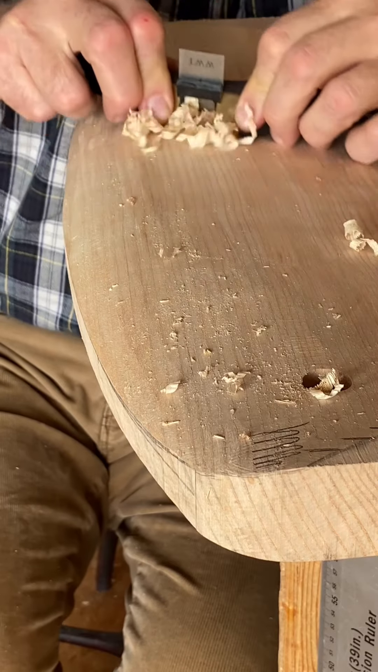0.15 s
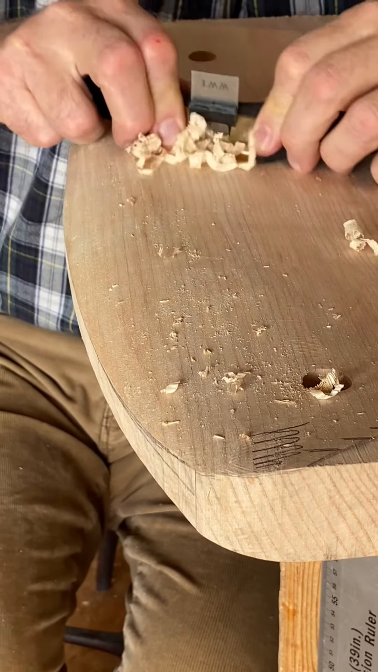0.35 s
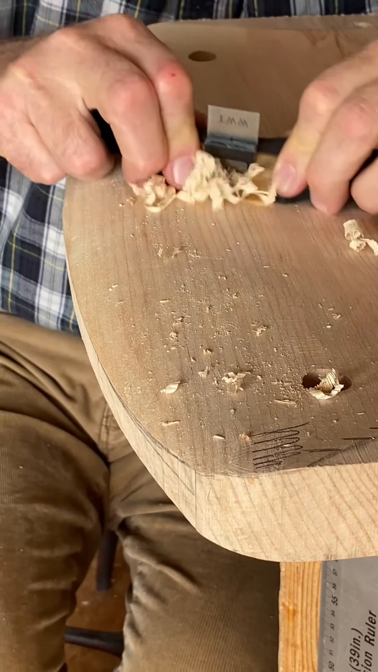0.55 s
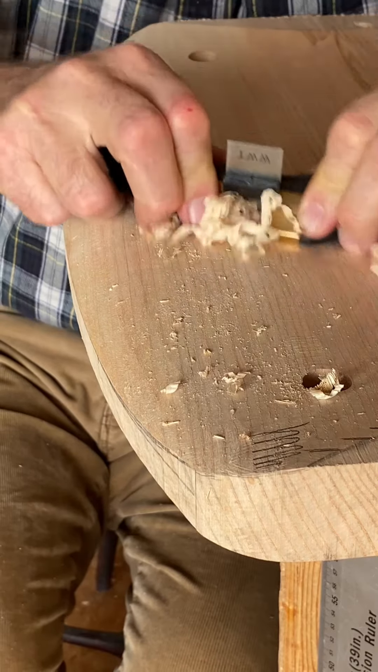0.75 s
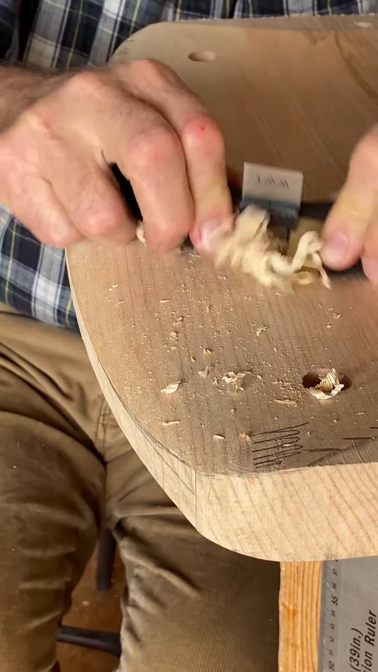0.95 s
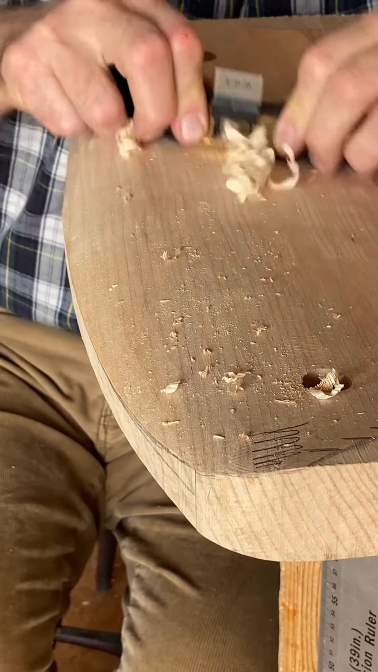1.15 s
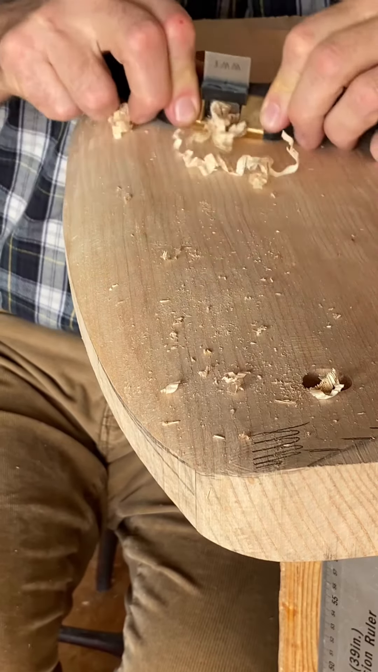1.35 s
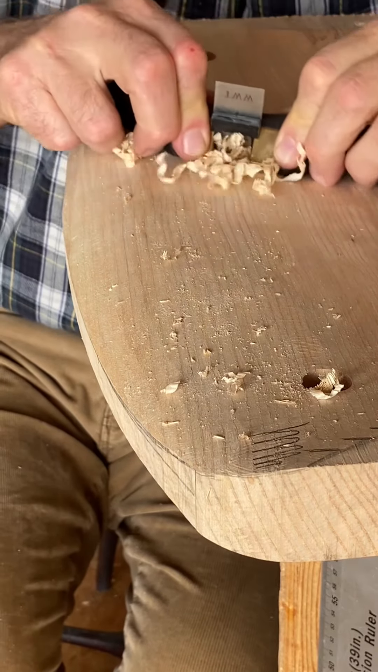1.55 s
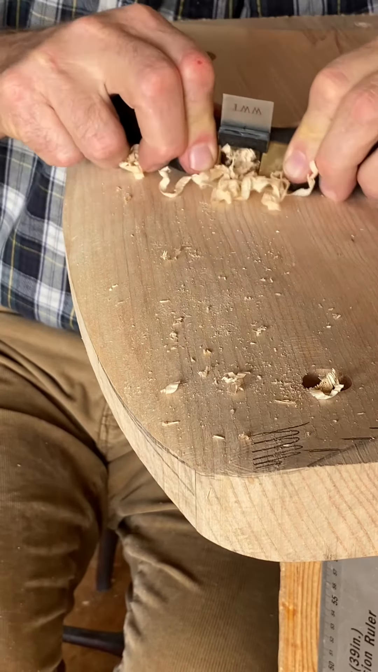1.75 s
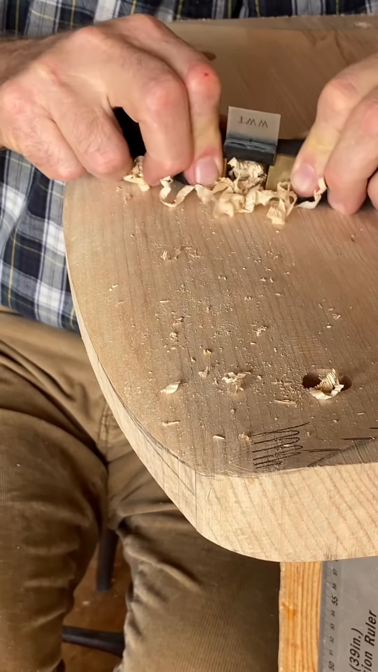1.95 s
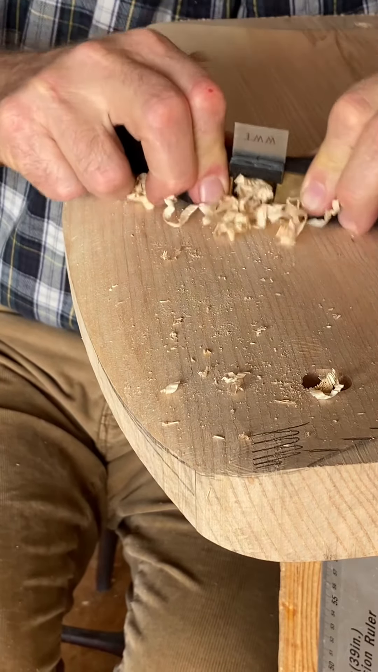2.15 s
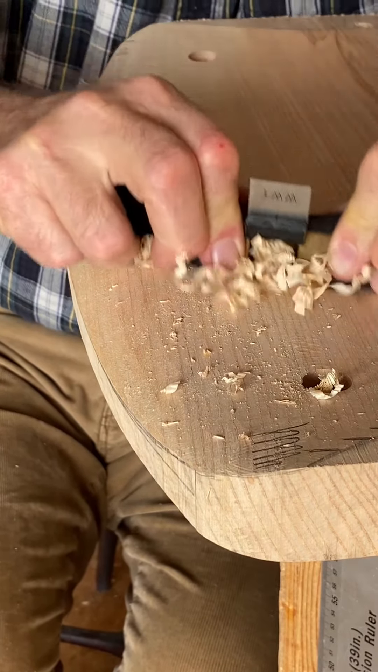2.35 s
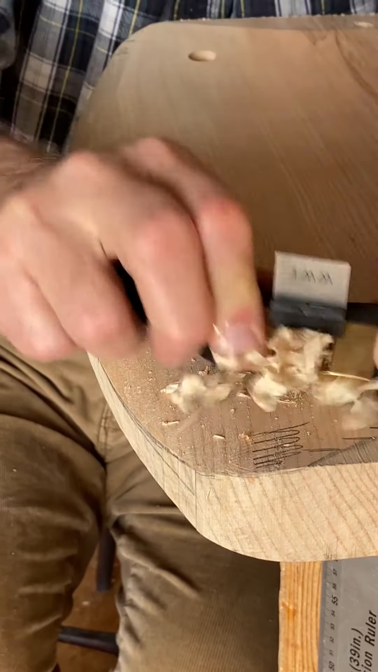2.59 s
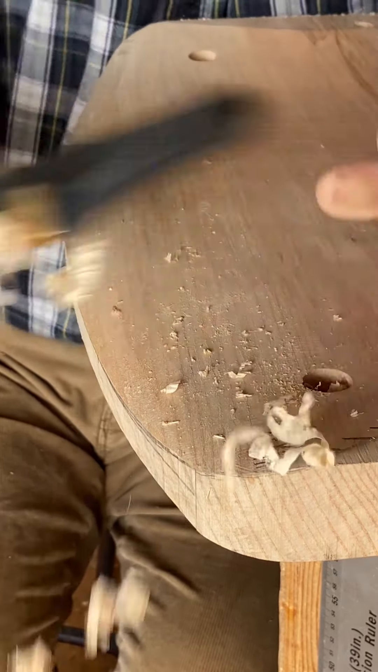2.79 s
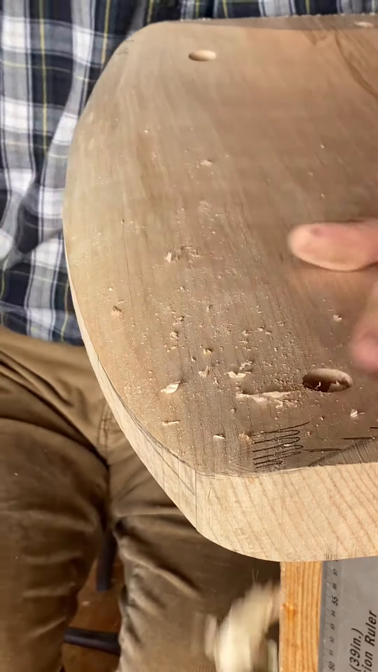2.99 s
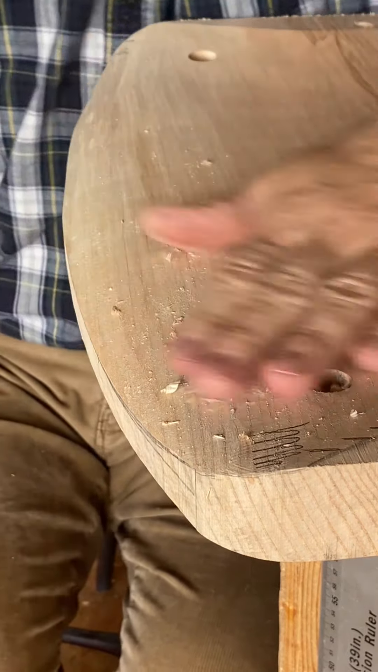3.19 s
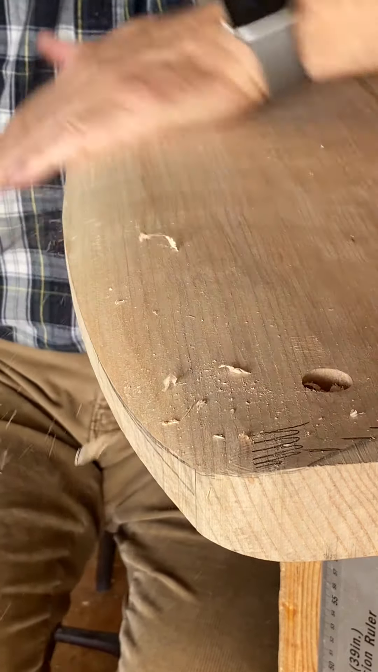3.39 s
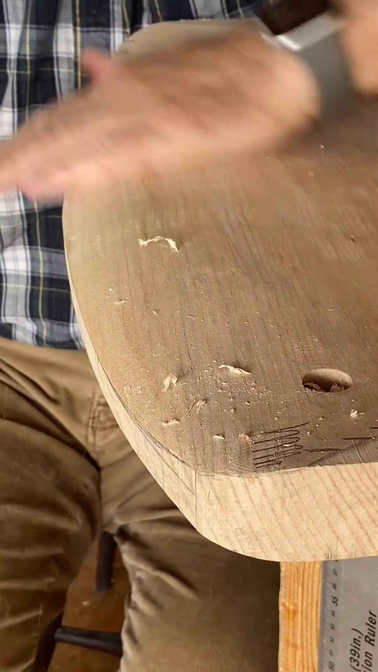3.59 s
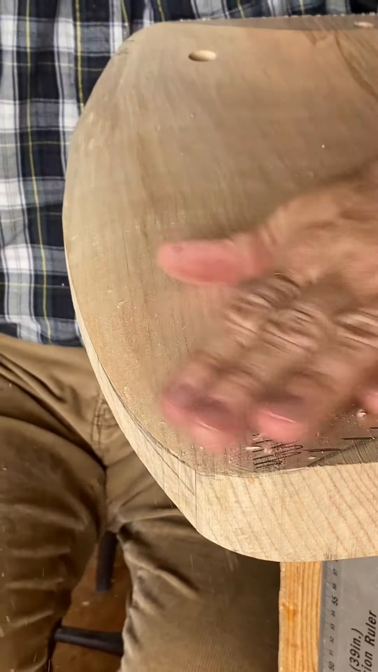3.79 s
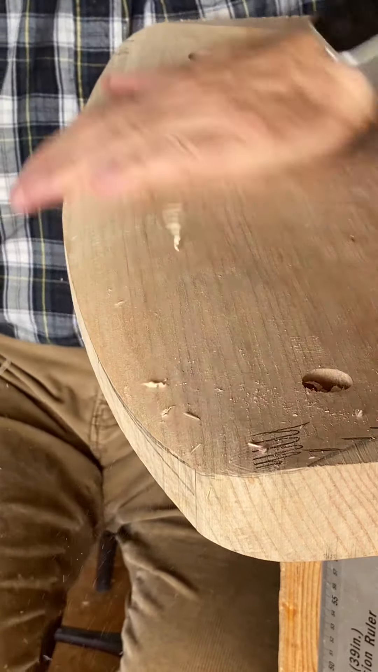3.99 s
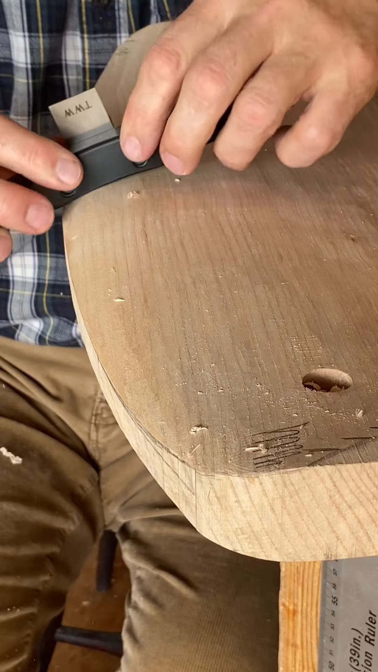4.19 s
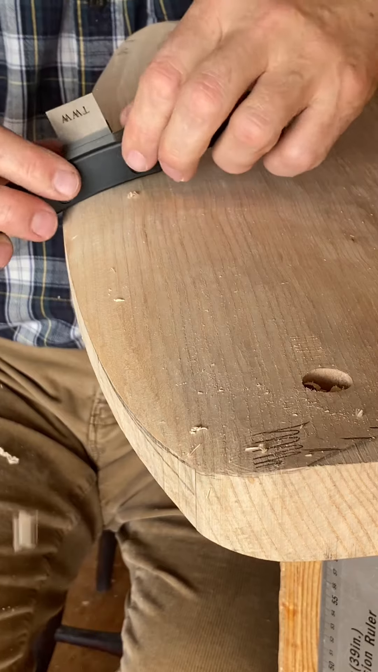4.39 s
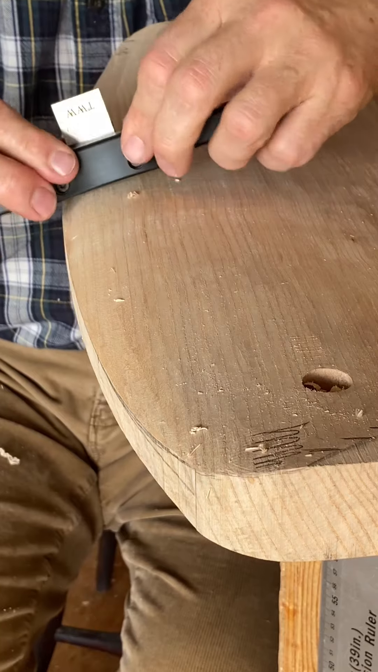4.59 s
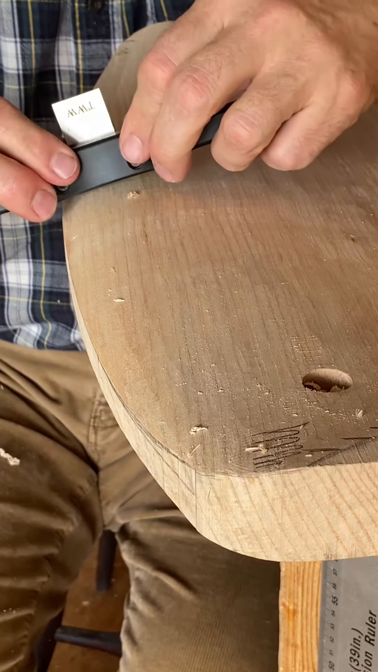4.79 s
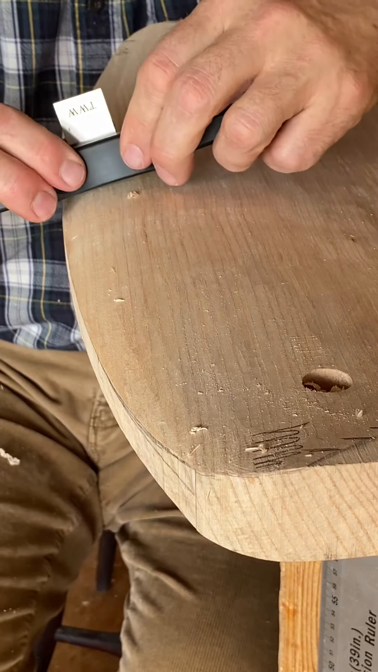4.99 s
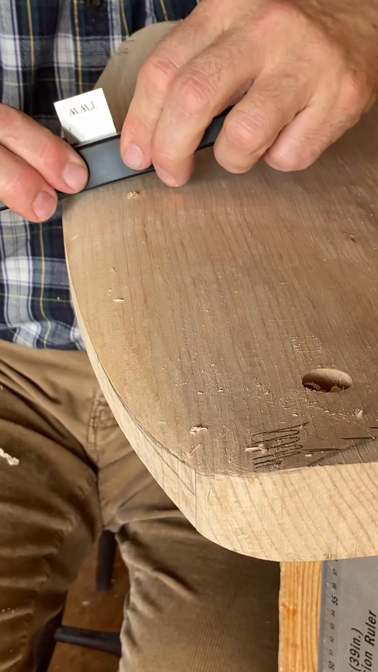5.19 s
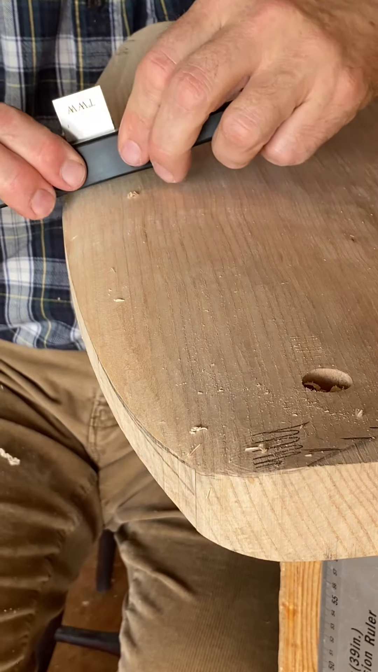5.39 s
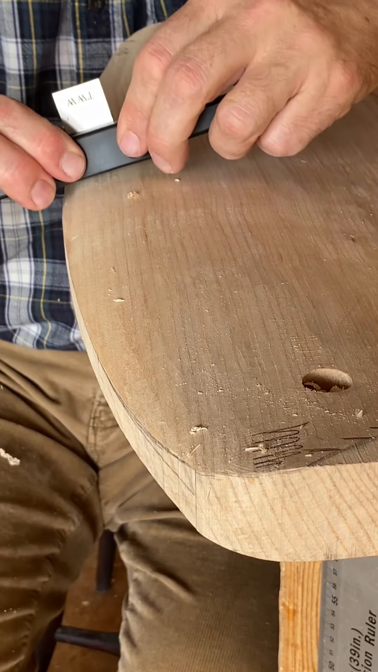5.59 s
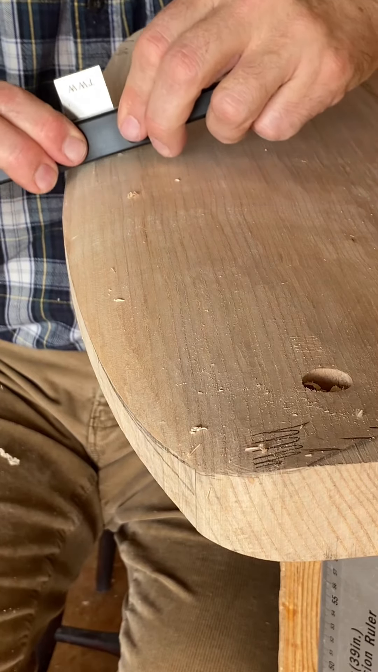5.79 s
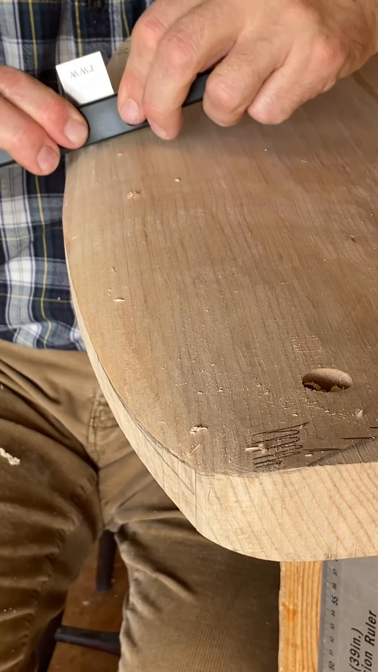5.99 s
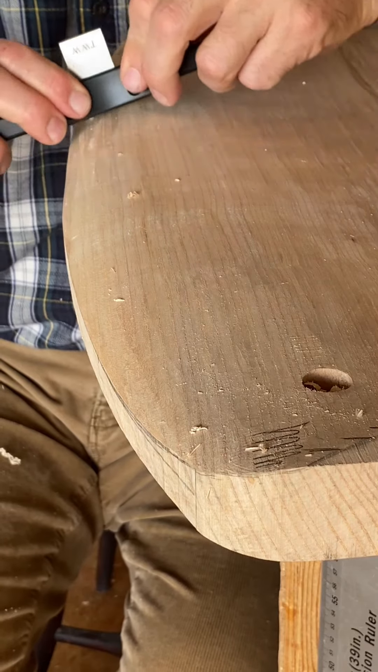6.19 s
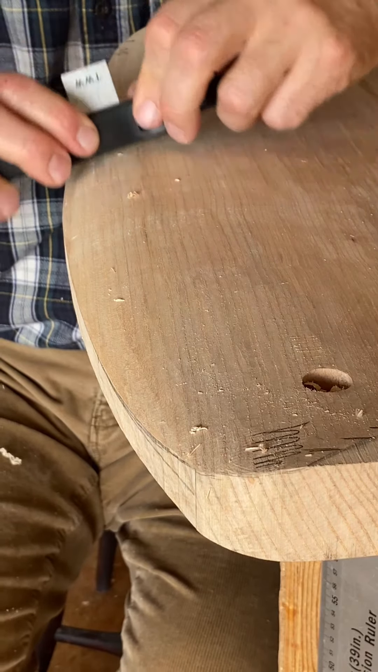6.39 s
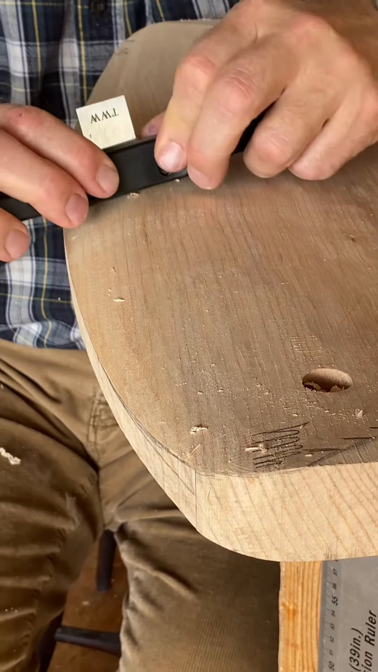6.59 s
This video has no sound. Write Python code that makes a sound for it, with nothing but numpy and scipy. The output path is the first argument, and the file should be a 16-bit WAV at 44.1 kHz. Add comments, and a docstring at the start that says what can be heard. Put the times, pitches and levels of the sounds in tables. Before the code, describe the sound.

A hand scraper rasps across a resonant wooden board, hand sweeps hiss over it, near silence follows, then duller creaking strokes work along the edge.

```python
"""Hand scraper on a hardwood board

A blade is pushed over the face of a seat board, a palm sweeps it, then the blade works along the rim. Random
slips drive board and springy blade resonances; filtered grains make edge rasp and fibre hiss. Sawtooth runs
judder and groan; blows and cracks ring in a short workshop reverb, while rustles and a low rumble join dry. Two
microphone ports hear it with phase lag, partial coherence and a level balance per frequency."""
import sys
import numpy as np
from scipy import signal
from scipy.fft import rfft, irfft, next_fast_len
from scipy.io import wavfile

SR = 44100
rng = np.random.default_rng(int(sys.argv[2]) if len(sys.argv) > 2 else 0)


def generate_wav(signal):
    """Clip the signal to [-1, 1] and save it as 16-bit WAV at the path in sys.argv[1]."""
    frames = np.transpose(np.atleast_2d(signal))
    scaled = np.clip(frames, -1, 1) * 32767
    pcm = np.round(scaled).astype(np.int16)
    wavfile.write(sys.argv[1], SR, pcm)


N = 293265
TAPS = 16384  # length of the impulse responses, samples
TIME = np.arange(N) / SR
TAP_TIME = np.arange(TAPS) / SR
BINS = np.fft.rfftfreq(TAPS, 1 / SR)
SWEEPING_STOPS_S = 4.02  # the sweeping sound breaks off abruptly here; earlier blows excite the face, later ones the rim
STROKE_ARCH, SWEEP_ARCH = 1.72, 2  # a higher power gives a flatter top to the arch of hand speed

# fizz of dust and dry curls, relative spectrum: f/Hz, level/dB
DUST_COLOUR = [(6000, -30.5), (10000, -1), (12000, 0), (14300, 1.5), (15600, 0)]


def amp(db):
    """Decibels to gain."""
    return 10 ** (np.asarray(db) / 20)


def unit(x):
    """Scales to rms 1."""
    return x / np.sqrt(np.mean(x ** 2) + 1e-20)


def read(table, hz=BINS, axis=1):
    """One column of a table, interpolated along log frequency."""
    table = np.array(table, float)
    return np.interp(np.log(hz + 1), np.log(table[:, 0] + 1), table[:, axis])


def add(mix, s, peak_db, sound):
    """Mixes a sound in at time s, scaled to the given peak."""
    sound = amp(peak_db) * sound / abs(sound).max()
    part = mix[round(s * SR):][:len(sound)]
    part += sound[:len(part)]


def response(gain, band):
    """Minimum-phase impulse response of a gain curve; white noise of rms 1 leaves rms 1 in the band."""
    in_band = (BINS > band[0]) * (BINS < band[1])
    gain = gain / np.sqrt(np.mean(gain ** 2 * in_band))
    cepstrum = irfft(np.log(np.maximum(gain, 1e-5)))
    # fold the cepstrum to make it causal
    cepstrum[1:TAPS // 2] *= 2
    cepstrum[TAPS // 2 + 1:] = 0
    return irfft(np.exp(rfft(cepstrum)))


def ring(x, impulse):
    """Plays x through an impulse response."""
    return signal.oaconvolve(x, impulse)[:len(x)]


def coloured(x, colour, band):
    """Filters x by a table of f/Hz, level/dB, normalised in the band."""
    return ring(x, response(amp(read(colour)), band))


def lowpass(x, hz):
    """Second-order low-pass."""
    return signal.sosfilt(signal.butter(2, min(hz, SR / 2 - 1), fs=SR, output="sos"), x)


def wander(hz):
    """Slow random drift of rms 1, low-passed at the given rate."""
    return unit(lowpass(rng.standard_normal(N), hz))


def grains(per_s, spread_db):
    """Clicks of random sign at random moments, most small and a few large, rms 1."""
    size = amp(spread_db * np.minimum(rng.exponential(1, N), 4))
    sign = rng.choice([-1, 1], N)
    return unit(size * sign * (rng.random(N) < per_s / SR))


def sawtooth(turns, harmonics):
    """Sawtooth with a limited number of harmonics, from its phase in turns."""
    return sum(np.sin(2 * np.pi * k * turns) / k for k in range(1, harmonics + 1))


def resonate(x, hz, width_hz):
    """A resonance of gain 1 that follows the curve hz."""
    turn = np.exp(2j * np.pi * np.cumsum(hz) / SR)
    r = np.exp(-np.pi * width_hz / SR)
    # shift the resonance to 0 Hz, smooth, shift back
    smooth = signal.lfilter([1 - r], [1, -r], x / turn + 1e-18)
    return 2 * (turn * smooth).real


def swell(moves, axis, dip_db, arch):
    """Gain from a dB column: tops at start + rise, dip_db lower at the ends; overlaps add in power."""
    power = np.zeros(N)
    for move in moves:
        start, rise, fall = move[:3]
        from_top = TIME - start - rise
        slowness = np.maximum(-from_top / rise, from_top / fall)
        near = slowness < 3  # the tails run on past the ends
        power[near] += amp(move[axis] - dip_db * slowness[near] ** arch) ** 2
    return np.sqrt(power)


def scrape(face, rim):
    """The blade sticks and slips at random, digging in and letting go over the grain."""
    # pushes over the face, relative levels: start t/s, speeding up t/s, slowing down t/s,
    # cutting force/dB, slow flexing/dB, edge rasp/dB, fibre hiss/dB, held blade resonance f/Hz
    face_strokes = [(0.0, 0.074, 0.21, -35.5, -43.5, -46.5, -57.5, 528),
                    (0.19, .19, 0.22, -35.5, -45.5, -46.5, -56.5, 486.6),
                    (0.5, 0.2, 0.13, -33, -42, -38.5, -50, 447),
                    (0.872, 0.026, 0.21, -36, -56, -42, -59.5, 534),
                    (0.93, 0.068, 0.19, -30.5, -48, -42, -57.5, 545),
                    (1.23, 0.088, 0.24, -35, -45.5, -47, -55.5, 505),
                    (1.56, 0.14, 0.12, -38.5, -48.5, -52, -60, 440),
                    (1.78, 0.088, 0.13, -43.5, -45, -57.5, -68, 440),
                    (1.97, 0.082, 0.11, -41, -64.5, -49, -57.5, 495),
                    (2.04, 0.14, 0.32, -34.5, -42, -39, -51.5, 415),
                    (2.3, 0.094, 0.123, -35.5, -42, -67, -53, 493.5),
                    (2.44, 0.073, 0.45, -59.5, -60, -65, -75, 383.6)]
    # pushes along the rim, same columns
    rim_strokes = [(5.18, 0.022, 0.044, -58.5, -53.5, -82, -91, 357),
                   (5.268, 0.032, 0.021, -54, -48, -73, -86, 396),
                   (5.36, 0.21, 0.71, -42.5, -44, -62.5, -69.5, 394),
                   (5.68, 0.31, 0.13, -32, -46.5, -52, -52, 459),
                   (5.87, 0.058, 0.055, -36, -42, -71, -87, 500),
                   (6.18, 0.12, 0.11, -33, -50.5, -51, -64, 732),
                   (6.33, 0.071, 0.092, -35, -49, -49, -61.5, 954),
                   (6.51, 0.077, 0.17, -36, -45, -52.5, -54.5, 430)]
    # slip force briefly rises or falls: t/s, half-length t/s, force change/dB
    force_changes = [(0.341, 0.017, -1.5), (0.974, 0.012, 3.5), (1.033, 0.008, 7), (1.066, 0.013, 6.5),
                     (1.157, 0.016, 3), (1.513, 0.03, 6), (2.281, 0.019, 4.5), (5.955, 0.016, -1),
                     (6.305, 0.013, 5)]
    # relative spectra of edge rasp and fibre hiss: f/Hz, level/dB
    face_rasp = [(700, -29), (1150, 2), (1650, 3.5), (2000, 5), (2250, 1), (2450, 5), (2750, 1), (3150, 0),
                 (3500, -4.5), (3850, -6), (4300, -15), (5500, -18), (9000, -48)]
    rim_rasp = [(700, -36), (1250, 5.5), (1600, 5), (1900, 1.5), (2250, 8.5), (2620, -1), (2900, 3.5),
                (3250, -3), (3650, -4.5), (4100, -14.5), (5500, -12), (9000, -42)]
    face_hiss = [(2000, -2.5), (4000, 0.5), (4900, 5.5), (5800, 5.5), (7500, 11), (8500, 4), (10100, 5),
                 (11200, 0), (13500, 2.5), (15500, 2)]
    rim_hiss = [(2000, -17), (4000, 0), (6000, 1), (7000, -3), (7900, 10.5), (9000, -15), (10200, -5),
                (11700, 12.5), (12900, -7.5), (14000, 6.5), (15500, -7)]
    bite = wander(24)
    slip_force = amp(sum(db * np.exp(-((TIME - s) / length) ** 2) for s, length, db in force_changes))
    slips = slip_force * grains(1900, 0.83)
    out = shake(face_strokes, slips, face, body_db=-12.5, flex_db=6.0, blade_db=-5.0,
                blade_width_hz=630, chatter_db=-22)
    out += shake(rim_strokes, slips, rim, body_db=-12.5, flex_db=8.0, blade_db=-5.0,
                 blade_width_hz=506, chatter_db=-27)
    out += shave(face_strokes, slips, bite, face_rasp, face_hiss, rasp_db=-4.0, hiss_db=2.5)
    return out + shave(rim_strokes, slips, bite, rim_rasp, rim_hiss, rasp_db=-1.5, hiss_db=-9.0)


def shake(strokes, slips, body, body_db, flex_db, blade_db, blade_width_hz, chatter_db):
    """Slips drive the board, partly through the springy blade, which also chatters at its resonance."""
    force = swell(strokes, axis=3, dip_db=10, arch=STROKE_ARCH)
    flex = swell(strokes, axis=4, dip_db=9, arch=STROKE_ARCH)
    slow = signal.sosfiltfilt(signal.butter(6, 320, fs=SR, output="sos"), slips)
    push = force * (slips - slow)
    held_hz = held_blade(strokes)
    push = push - resonate(push, 0.26 * held_hz, 230)  # little passes well below the blade's resonance
    blade = resonate(push, held_hz, blade_width_hz)
    highpass = signal.butter(4, 300, "high", fs=SR, output="sos")
    buzz = force * signal.sosfilt(highpass, chatter(held_hz))
    drive = amp(body_db) * push + amp(blade_db) * blade
    drive += amp(chatter_db) * buzz + amp(flex_db) * flex * slow
    return ring(drive, body)


def held_blade(strokes):
    """Resonance of the springy blade (Hz): it moves from push to push and wavers with the grip."""
    start, rise, *_, blade_hz = np.transpose(strokes)
    grip_wobble = 0.069  # rms, log frequency
    return np.interp(TIME, start + rise, blade_hz) * np.exp(grip_wobble * wander(30))


def chatter(hz):
    """One slip for each swing of the blade, uneven in timing and size."""
    jitter, spread_db = 0.15, 1.5  # rms of log rate and of strength
    turns = np.cumsum(hz * np.exp(jitter * wander(250))) / SR
    clicks = np.diff(np.floor(turns), prepend=0)
    return unit(clicks * amp(spread_db * wander(90)))


def shave(strokes, slips, bite, rasp_colour, hiss_colour, rasp_db, hiss_db):
    """Each slip breaks off a chip at the edge; fibres tear between them in a finer stream."""
    depth = swell(strokes, axis=5, dip_db=14.5, arch=STROKE_ARCH)
    hiss = swell(strokes, axis=6, dip_db=12.5, arch=STROKE_ARCH)
    chips = unit((slips + 1.2 * grains(5000, 3.3)) * amp(0.91 * bite))
    fibres = unit((0.056 * slips + grains(8000, 0.9)) * amp(1.6 * bite + 0.85 * wander(120)))
    edge = coloured(chips * depth, rasp_colour, (1500, 3800))
    # the growing shaving rings at a drifting pitch
    curl_hz = 2130 * np.exp(0.25 * wander(17))
    edge += amp(0.5) * resonate(edge, curl_hz, width_hz=150)
    tearing = coloured(fibres * hiss, hiss_colour, (5300, 7500))
    return glance(amp(rasp_db) * edge + amp(hiss_db) * tearing, share=0.22, delay_s=.002, drift=.12)


def board(axis):
    """The ring of the board, a sum of resonances driven on the face (axis 2) or at the rim (axis 3)."""
    # board resonances, relative levels: f/Hz, width f/Hz, face level/dB, rim level/dB
    modes = [(83, 9, -10, -5.5), (127, 11, -7, -5.5), (172, 20, -11, -7), (197, 15, -13, -5),
             (246, 13, -5.5, -3), (265, 24, -8.5, -20), (287, 13, -9, -3), (320, 22, -7.5, -11),
             (350, 24, -6, -5.5), (392, 12, -24, -7), (421, 20, -3, -1), (465, 32, -2, -1.5),
             (506, 40, -11, -16), (527, 22, -5.5, -19), (553, 14, -7, -9), (583, 17, -4, -10),
             (626, 17, -12, -5.5), (675, 45, -12, -9.5), (745, 50, -11.5, -3.5), (805, 30, -9, -9),
             (850, 30, -14, -14), (920, 35, -16, -8), (958, 24, -7.5, -5), (992, 25, -8.5, -15),
             (1075, 60, -9.5, -17), (1140, 55, -9, -15), (1200, 25, -22, -10), (1378, 30, -13, -13),
             (1425, 30, -16, -15), (1567, 40, -15, -11), (1688, 18, -15, -16), (2010, 50, -11, -22),
             (2260, 72, -30, -20), (2430, 50, -20, -32), (2602, 30, -22, -34), (2910, 40, -29, -20)]
    power = 0
    for mode in modes:
        detune = (BINS ** 2 - mode[0] ** 2) / (mode[1] * (BINS + 1))
        power = power + amp(mode[axis]) ** 2 / (1 + detune ** 2)
    # radiation: f/Hz, level/dB
    radiated = read([(20, -20.5), (70, 3.0), (1100, 3.5), (2500, 1.5), (4500, -19.0), (9000, -41.0)])
    return response(np.sqrt(power) * amp(radiated), (330, 1300))


def judders(face, rim):
    """A few nearly regular sawtooth slips in a row pump the board near one resonance."""
    # the tool catches, peaks before the room: middle t/s, peak level/dB, mean slip rate f/Hz, length t/s
    catches = [(0.101, -33, 527, 0.008), (0.17, -33.5, 458, 0.0076), (0.264, -31, 514, 0.0078),
               (0.328, -31, 580, 0.0071), (0.344, -26.5, 470, 0.0063), (0.358, -27, 453, .014),
               (0.456, -29.5, 518, .014), (0.492, -29, 520, .03), (0.637, -28.5, 570, 0.016),
               (0.723, -25, 526, 0.0064), (0.77, -31.5, 560, 0.0064), (0.887, -30.5, 840, 0.0042),
               (0.927, -25.5, 512, .01), (0.982, -21, 600, 0.007), (0.984, -26, 530, 0.0079),
               (1.028, -15.5, 606, .009), (1.067, -15, 566, .011), (1.163, -33.5, 586, 0.014),
               (1.328, -33, 502, .012), (1.438, -31, 495, 0.0074), (1.518, -36, 534, .016),
               (1.539, -41, 490, .012), (1.632, -47, 489, 0.013), (2.122, -26, 546, 0.012),
               (2.135, -31, 490, 0.0099), (2.196, -26.5, 567, .024), (2.277, -42, 426, .012),
               (2.389, -26.5, 532, 0.0091), (2.425, -38, 446, 0.012), (2.534, -49, 400, 0.0049),
               (4.051, -53, 375, 0.018), (4.065, -49, 372, 0.0063), (4.099, -53.5, 430, .016),
               (4.151, -56, 446, 0.011), (4.313, -64, 402.6, 0.0036), (4.648, -63, 436, 0.0093),
               (4.74, -56, 341, 0.006), (4.752, -63, 359, 0.0065), (4.777, -59, 326.4, 0.0056),
               (4.817, -58.5, 256, 0.013), (4.909, -57, 380, 0.0088), (4.943, -60.5, 352, 0.0094),
               (5.206, -53, 325, 0.0098), (5.284, -40.5, 384, .006), (5.304, -52, 410, 0.0064),
               (5.432, -40, 345, 0.014), (5.487, -35, 380, 0.0067), (5.503, -30.5, 410, 0.0047),
               (5.541, -31, 413, 0.022), (5.558, -34, 428, 0.0091), (5.676, -34.5, 405, 0.017),
               (5.701, -31.5, 383, 0.011), (5.874, -42, 491, .012), (5.926, -27.5, 434, 0.013),
               (5.955, -32, 343, 0.014), (6.017, -36.5, 486, 0.0052), (6.038, -31, 397, 0.0065),
               (6.308, -28, 723, 0.032), (6.346, -29.5, 630, 0.02), (6.454, -33, 635, 0.03),
               (6.583, -35, 440, 0.0096)]
    out = np.zeros(N)
    for s, db, hz, length in catches:
        jitter = 0.083 * unit(lowpass(rng.standard_normal(TAPS), hz))
        turns = np.cumsum(hz * np.exp(jitter)) / SR
        window = np.sin(np.pi * np.minimum(TAP_TIME / length, 1)) ** 2
        sound = ring(sawtooth(turns, 6) * window, face if s < SWEEPING_STOPS_S else rim)
        add(out, s - length / 2, db, sound)
    return out


def groans(face, rim):
    """Long runs of sawtooth slips glide across the resonances of the board."""
    # longer chatter, peaks before the room: start t/s, length t/s, peak level/dB,
    # mean slip rate at start f/Hz, in the middle f/Hz, at the end f/Hz
    runs = [(0.562, 0.12, -34, 424, 310, 255), (0.645, 0.11, -25, 263.2, 237, 408),
            (0.75, 0.12, -37, 258, 249, 363.7), (0.976, .06, -29, 452, 405, 496),
            (1.675, 0.16, -32.5, 501, 480, 480), (1.82, 0.084, -35.5, 484, 471, 482),
            (1.985, 0.07, -32.5, 484, 459, 470), (2.089, 0.072, -24.5, 314, 288.5, 244),
            (2.126, .105, -27, 242, 250, 319), (2.233, 0.099, -29.5, 294.6, 315.7, 332),
            (2.298, 0.083, -33, 253, 233, 269), (5.941, 0.13, -21, 267.2, 251, 238),
            (6.057, 0.13, -38, 242.2, 250.7, 234.5)]
    jitter_rms, spread_db = 0.1, 3  # unevenness of log rate and of strength
    out = np.zeros(N)
    for s, length, db, *rates_hz in runs:
        progress = np.minimum(TAP_TIME / length, 1)
        jitter, strength = (unit(lowpass(row, 110)) for row in rng.standard_normal((2, TAPS)))
        rate_hz = np.interp(progress, [0, .5, 1], rates_hz) * np.exp(jitter_rms * jitter)
        saw = sawtooth(np.cumsum(rate_hz) / SR, 8)
        drive = saw * np.sin(np.pi * progress) * amp(spread_db * strength)
        add(out, s, db, ring(drive, face if s < SWEEPING_STOPS_S else rim))
    return out


def clacks():
    """The body of the tool taps the wood as it leaves and rings very briefly in decaying sines."""
    # taps, peaks before the room: t/s, peak level/dB
    taps = [(2.471, -24.5)]
    # ring of the tool, relative levels: f/Hz, level/dB, t60 t/s
    partials = [(655, -0.5, 0.079), (1010, 2.5, 0.053), (1835, 1.5, 0.031), (2270, -8, 0.029),
                (2910, -3, 0.026)]
    t = TAP_TIME
    sound = sum(amp(db - 60 * t / t60) * np.sin(2 * np.pi * hz * t) for hz, db, t60 in partials)
    sound = sound * np.minimum(t / 0.001, 1)  # 1 ms rise
    out = np.zeros(N)
    for s, db in taps:
        add(out, s, db, sound)
    return out


def knocks(face, rim):
    """Blows of tool and hand: the softer the touch, the fewer resonances of the board it reaches."""
    # blows, peaks before the room: t/s, peak level/dB, low-pass f/Hz
    blows = [(2.476, -32, 1002), (2.501, -38, 104), (2.572, -44, 120), (2.866, -40, 56.7),
             (3.645, -41, 480), (3.666, -36, 140), (3.692, -31.5, 110), (3.753, -42, 112.3),
             (4.551, -43, 1205), (4.556, -41.5, 540), (4.567, -39, 800), (4.578, -41, 800),
             (4.595, -46, 1100), (4.612, -38, 257), (4.652, -47, 600), (5.202, -42, 396), (5.289, -42, 700),
             (5.306, -39, 900)]
    out = np.zeros(N)
    for s, db, hz in blows:
        sound = lowpass(lowpass(face if s < SWEEPING_STOPS_S else rim, hz), hz)
        add(out, s, db, sound)
    return out


def snaps():
    """The edge ticks, splinters snap and chips land: tiny dry noise cracks that die in milliseconds."""
    # cracks, peaks before the room: t/s, peak level/dB, centre f/Hz
    cracks = [(1.607, -41, 11930), (1.934, -38, 6500), (2.838, -46, 9400), (2.9385, -39, 3450),
              (2.939, -28.5, 9300), (2.947, -36, 9800), (2.985, -31.5, 8000), (3.097, -34, 12600),
              (3.112, -34, 12500), (3.640, -23.5, 13600), (3.674, -29, 11900), (4.24, -70, 5460)]
    out = np.zeros(N)
    t = np.arange(2048) / SR
    for s, db, hz in cracks:
        crack = rng.standard_normal(len(t)) * np.exp(-t / 0.0029)
        bell = 1 / (1 + (np.log((BINS + 1) / hz) / .3) ** 2)
        add(out, s, db, ring(crack, response(bell, (0, SR))))
    return out


def settle(body):
    """Each shift of the tool starts a dull rattle on the board that dies away."""
    # the tool shifts and settles, relative levels: t/s, level/dB, t60 t/s
    shifts = [(4.019, -57.5, 5), (4.549, -42, 0.6), (4.754, -60.5, 0.49)]
    rise_s = 0.0055
    level = np.zeros(N)
    for s, db, t60 in shifts:
        age = np.maximum(TIME - s, 0)
        level += np.minimum(age / rise_s, 1) * amp(db) * np.exp(-np.log(1000) * age / t60)
    rattle = lowpass(lowpass(grains(660, 0.72), 350), 800)
    return ring(rattle * level, body)


def palm(skin_db, rub_db, dust_db):
    """Skin hisses smoothly over the wood, fuller when pressed, and rolls fizzing dust ahead of it."""
    # sweeps, relative levels: start t/s, speeding up t/s, slowing down t/s,
    # skin hiss/dB, rub of the pressed hand/dB, dust fizz/dB
    sweeps = [(2.85, .12, 0.16, -55, -74.5, -55.5), (3.03, 0.26, 0.12, -41, -47.5, -51),
              (3.42, 0.19, 0.094, -43, -52, -53), (3.61, 0.049, 0.028, -45.5, -56.5, -47.5),
              (3.69, 0.16, 0.3, -41, -51, -51)]
    # resonance of the hollow under the moving palm: t/s, f/Hz
    hollow = [(3.1, 2800), (3.28, 3000), (3.32, 4100), (3.4, 2660), (3.54, 3850), (3.6, 3580),
              (3.655, 2200), (3.78, 3000), (3.98, 3380)]
    # relative spectra of skin hiss and rub: f/Hz, level/dB
    skin_colour = [(600, -20.5), (1400, 0.5), (2000, 4.5), (3000, 6.5), (3800, 5.5), (4500, 6.5), (5800, 9),
                   (8000, 9.5), (10000, -3), (12000, -16), (16000, -10)]
    rub_colour = [(60, -14), (200, -1.5), (330, -8), (480, -2), (700, -3), (980, -3.5), (1400, -3.5),
                  (2000, -6.5), (3000, -15.5), (6000, -62)]
    sounding = np.clip((SWEEPING_STOPS_S - TIME) / 0.013, 0, 1)  # 13 ms fade to the stop
    level = sounding * swell(sweeps, axis=3, dip_db=21.5, arch=SWEEP_ARCH)
    pressed = sounding * swell(sweeps, axis=4, dip_db=10.5, arch=SWEEP_ARCH)
    dust = sounding * swell(sweeps, axis=5, dip_db=15.5, arch=SWEEP_ARCH)
    ridges = level * unit(grains(16000, 0.62) * amp(0.66 * wander(78)))
    skin = coloured(ridges, skin_colour, (2000, 7500))
    hollow_hz = np.interp(TIME, *np.transpose(hollow))
    skin += amp(-4) * resonate(skin, hollow_hz, width_hz=1000)
    rub = coloured(pressed * grains(4000, 1.5), rub_colour, (400, 1600))
    fizz = coloured(dust * grains(7000, 2.8), DUST_COLOUR, (12500, 15500))
    both = amp(skin_db) * skin + amp(rub_db) * rub + amp(dust_db) * fizz
    return glance(both, share=0.3, delay_s=.0011, drift=0.13)


def rustles(curls_db, fingers_db):
    """Thin curls fizz as they crumple against the blade; fingers brush and scuff the handle."""
    # curls crumple, relative levels: start t/s, rise t/s, fall t/s, level/dB
    crumples = [(0.735, 0.036, 0.038, -51.5), (0.84, 0.018, 0.039, -56.5), (2.34, 0.031, 0.03, -46)]
    # fingers on the handle, same columns
    touches = [(3.99, 0.08, 0.32, -85), (4.21, 0.015, 0.027, -89), (4.549, 0.0048, 0.013, -75.5),
               (4.555, .02, 0.1, -83), (4.78, .03, .04, -92), (5.03, .09, .07, -91.5)]
    # relative spectrum of the fingers: f/Hz, level/dB
    brush_colour = [(300, -7.5), (1200, 17.5), (1500, -3), (2500, -1.5), (4000, -20), (7000, -11.5),
                    (12000, -27.5)]
    curls = grains(5000, 3.0) * swell(crumples, axis=3, dip_db=13.5, arch=1.6)
    fingers = grains(1500, 1.9) * swell(touches, axis=3, dip_db=12, arch=2.2)
    fizz = coloured(curls, DUST_COLOUR, (12500, 15500))
    brush = coloured(fingers, brush_colour, (1500, 3800))
    return amp(curls_db) * fizz + amp(fingers_db) * brush


def leans(body):
    """Shifting weight stirs mainly the lowest resonances of the board: a soft, continuous rumble."""
    # the hands lean and rock the board: start t/s, rise t/s, fall t/s, level/dB
    rocks = [(0.98, 0.1, 0.21, -46.5), (2.41, 0.055, 0.22, -49), (2.7, 0.25, 0.16, -57),
             (3.66, 0.064, 0.18, -48), (4.73, 0.038, 0.16, -56.5), (6.3, .06, 0.085, -46.5)]
    weight = lowpass(lowpass(rng.standard_normal(N), 125), 125)
    return unit(ring(weight, body)) * swell(rocks, axis=3, dip_db=8.5, arch=1.4)


def shop():
    """Steady low air noise of the workshop: filtered white noise."""
    # relative spectrum: f/Hz, level/dB
    air_colour = [(20, -40.5), (33, -14), (48, 8), (90, 5.5), (150, -6), (300, -15), (600, -23.5),
                  (1200, -27), (2500, -39), (6000, -39), (10000, -46), (16000, -51)]
    return amp(-63.5) * unit(coloured(rng.standard_normal(N), air_colour, (0, SR)))


def in_room(x, room_db):
    """Adds dense workshop reflections that die band by band."""
    # reverberation: f/Hz, t60 t/s
    decay = [(100, 0.2), (600, 0.14), (3000, 0.017), (14000, 0.0087)]
    hz, t, z = signal.stft(rng.standard_normal(TAPS), SR, nperseg=256)
    t60 = read(decay, hz)[:, None]
    tail = signal.istft(z * amp(-60 * t / t60) / np.sqrt(t60), SR, nperseg=256)[1]
    return x + amp(room_db) * ring(x, tail / np.linalg.norm(tail))


def glance(x, share, delay_s, drift):
    """Glancing reflections off board and hands comb the treble; their delays drift at random."""
    index = np.arange(N)
    out = x.copy()
    for bounce in range(1, 4):
        delay = bounce * delay_s * np.exp(drift * wander(2))
        source = index - np.round(delay * SR).astype(int)
        out += share * np.append(x, 0)[np.clip(source, -1, N - 1)]  # index -1 reads the added zero
    return out / np.sqrt(1 + 3 * share ** 2)


def ports(centre, flanks):
    """Two ports hear the centre with a phase lag, and unrelated flank rubbing in opposite signs."""
    # microphone ports: f/Hz, phase by which left leads/rad, coherence, left minus right level/dB
    pair = [(60, 0, 1, .1), (110, -.02, 1, .3), (300, -.16, .97, 1.7), (600, -.13, .86, 1.5),
            (850, -.34, .68, 2), (1250, -.74, .66, -1), (1800, .22, .88, -1.5), (2600, .77, .93, -.5),
            (3500, .29, .93, 0), (4200, .57, .86, 0), (4950, 2.2, .85, 0), (5600, 1.5, .88, 0),
            (7700, 2.75, .95, 0), (8500, 3.13, 1, 0), (11100, 3.15, 1, 0), (12500, 3.92, .82, 0),
            (15500, 5.22, .82, 0)]
    size = next_fast_len(N + TAPS)
    hz = np.fft.rfftfreq(size, 1 / SR)
    phase = read(pair, hz)
    same = np.clip(read(pair, hz, axis=2), 0, 1)
    balance_db = read(pair, hz, axis=3)
    side = np.array([[1], [-1]])
    both = np.sqrt((1 + same) / 2) * rfft(centre, size)
    both = both + side * np.sqrt((1 - same) / 2) * rfft(flanks, size)
    both = both * np.exp(.5j * side * phase) * amp(side * balance_db / 2)
    return irfft(both, size)[:, :N]


def friction(face, rim):
    """Everything that rubs: the blade, the tool shifting under the fingers, the shavings, the palm."""
    tool = in_room(scrape(face, rim) + settle(rim), room_db=-8.0)
    return tool + rustles(curls_db=1.0, fingers_db=-5.0) + palm(skin_db=-1.0, rub_db=-2.0, dust_db=0)


def scene():
    """Face pass, sweeping, a new grip, rim pass; centre and flanks of the wide edge slip separately."""
    face, rim = board(axis=2), board(axis=3)
    blows = in_room(judders(face, rim) + groans(face, rim) + clacks(), room_db=-8)
    blows += in_room(knocks(face, rim), room_db=-10.5)
    blows += in_room(snaps(), room_db=-3)
    centre = friction(face, rim) + blows + leans(face) + shop()
    flanks = friction(face, rim) + shop()
    return ports(centre, flanks)


def record(dry):
    """Band limit: a linear-phase low-pass."""
    edge_hz = 15850
    lowpass_taps = signal.firwin(511, edge_hz, window=("kaiser", 9), fs=SR)
    return signal.oaconvolve(dry, lowpass_taps[None], "same")


dry = scene()
out = record(dry)
generate_wav(out)
```